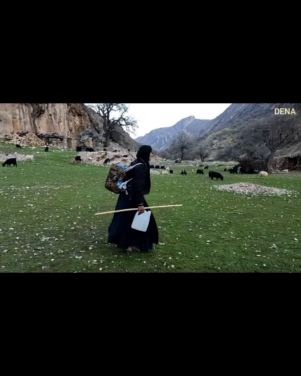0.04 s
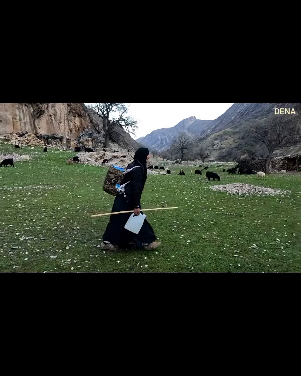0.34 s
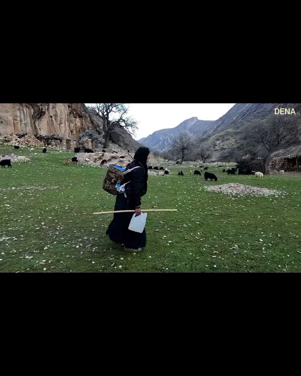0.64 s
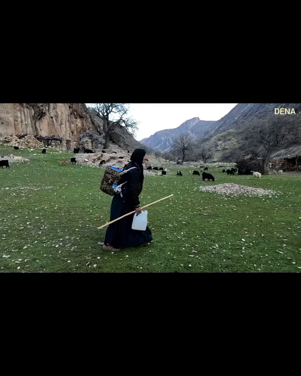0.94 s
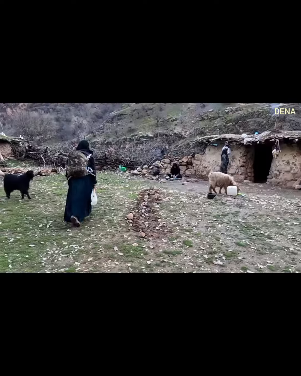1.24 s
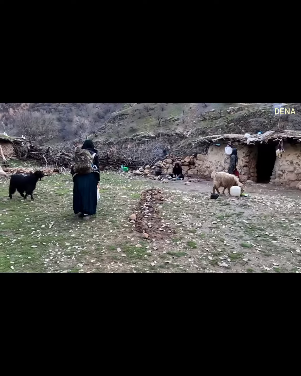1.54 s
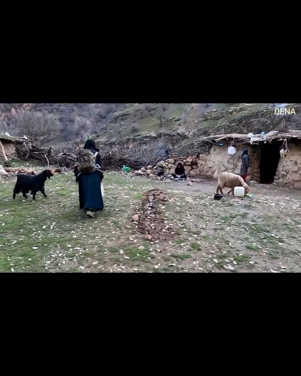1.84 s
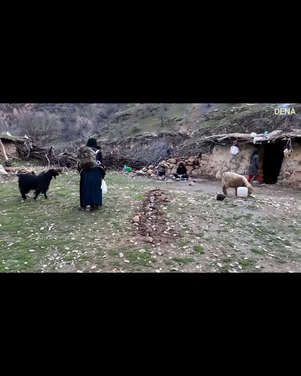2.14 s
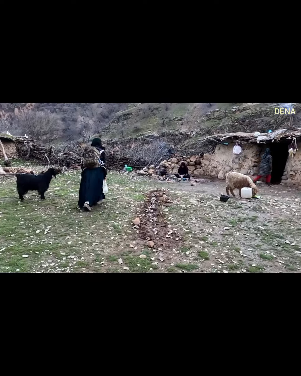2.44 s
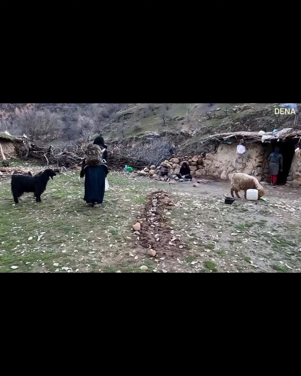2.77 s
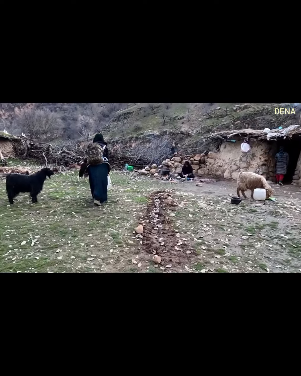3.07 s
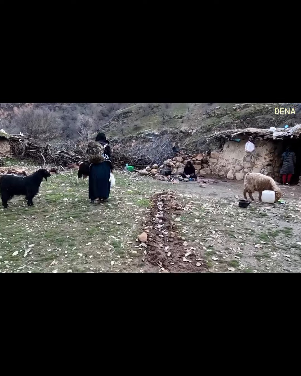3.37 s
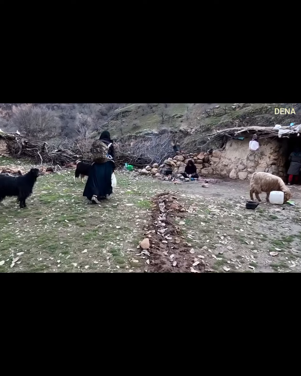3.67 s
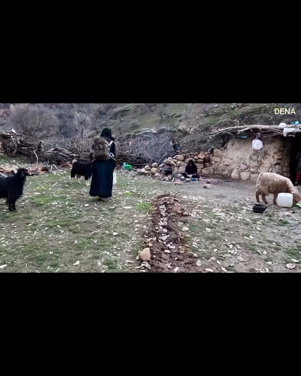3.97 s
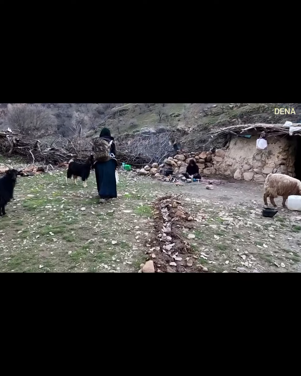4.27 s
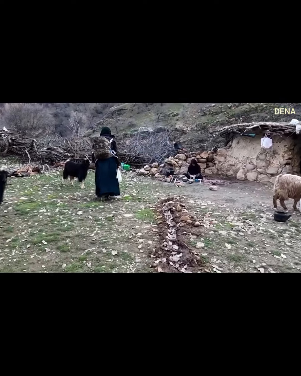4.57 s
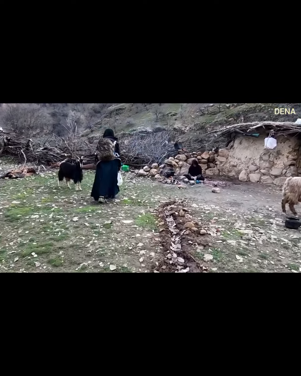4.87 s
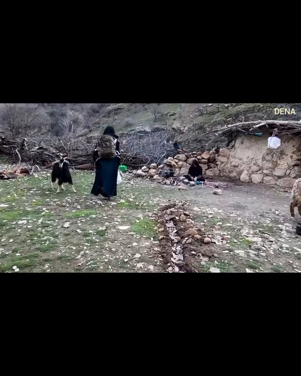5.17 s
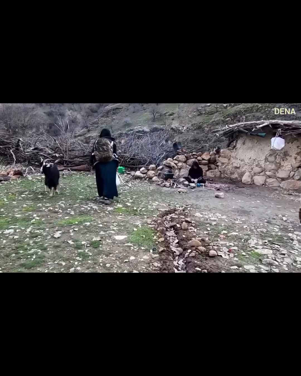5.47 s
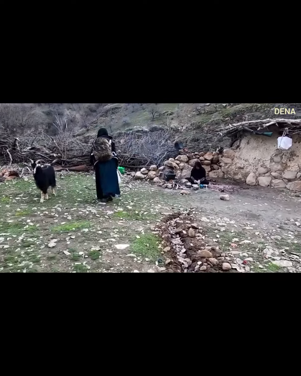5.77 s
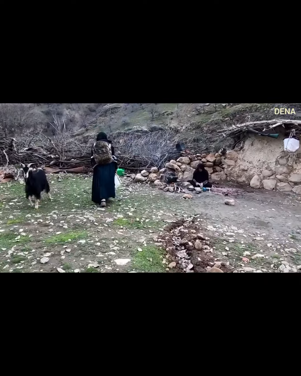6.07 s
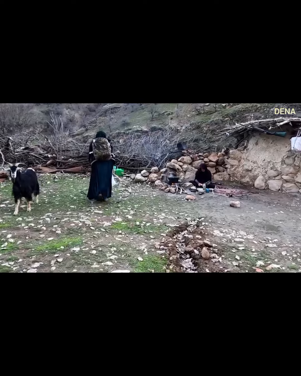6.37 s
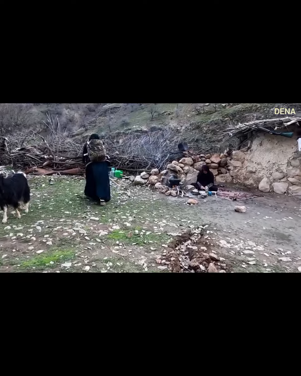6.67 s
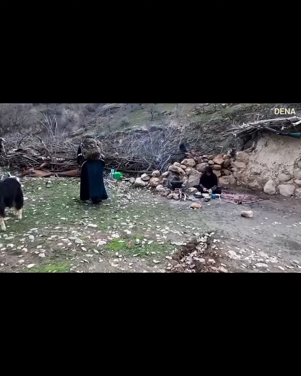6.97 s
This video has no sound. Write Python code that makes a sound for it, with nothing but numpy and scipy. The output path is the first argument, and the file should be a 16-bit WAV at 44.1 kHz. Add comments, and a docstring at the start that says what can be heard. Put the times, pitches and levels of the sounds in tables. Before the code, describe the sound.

For the first second, wind buffets the microphone on an open pasture, a low rumble with faint gravel scuffs and a sharp stone click at about 0.6 seconds. After a very brief gap, the sound moves to a stony yard with a steady low rush of air and lighter wind. A goat gives a distant, quavering bleat from 1.1 to 1.6 seconds, with a short wind thump under it. From about 2 seconds, a barely audible thin sizzle flickers on the left. A second, nasal bleat runs from 3.1 to 3.7 seconds, ending hoarsely and echoing slightly off a wall. A third, closer and more open bleat comes from 5.2 to 5.7 seconds. Soft footsteps scuff gravel throughout, with small stone clicks and a few dull heel falls in the second half. Three very faint high chirps come around 6.7 to 7 seconds.

```python
"""Goats bleat three times in a stony yard: throbs of vocal-fold pulses ring the throat and echo off a wall.
Before that, wind buffets the microphone on a pasture for a second; a brief gap leads into the yard.
Under the bleats: a low rush of air, lighter wind, steps scuffing gravel, small stones clicking.
A thin sizzle flickers on the left; three faint chirps come near the end."""
import sys
import numpy as np
from scipy import signal
from scipy.fft import rfft, irfft
from scipy.io import wavfile
from scipy.ndimage import uniform_filter1d

SR = 44100
rng = np.random.default_rng(int(sys.argv[2]) if len(sys.argv) > 2 else 0)


def wav_record(signal):
    """Record a signal, one row per channel, as 16-bit PCM in the file named by sys.argv[1]."""
    frames = np.transpose(np.atleast_2d(signal))
    bounded = np.clip(frames, -1, 1)
    # unit amplitude maps onto the largest positive 16-bit level
    quanta = np.round(bounded * 32767).astype(np.int16)
    wavfile.write(sys.argv[1], SR, quanta)


N = 313992
TIME_S = np.arange(N) / SR
FREQ_HZ = np.maximum(np.arange(N // 2 + 1) * SR / N, 1)
PASTURE_END_S, YARD_START_S = 1.009, 1.034

# air and wind spectra: (frequency [Hz], relative density [dB])
PASTURE_SPECTRUM = [(88, -25), (150, -4.5), (229, -9), (294, -13), (468, -16), (802, -22.5),
                    (1490, -22.5), (3090, -42), (4300, -51.5), (7200, -49.5), (9000, -63),
                    (12600, -56.5), (15000, -80)]
YARD_SPECTRUM = [(41, -28), (70, -1.5), (100, -0.5), (155, 4), (246, 2), (337, -1.5), (462, -4), (618, -9),
                 (1010, -13), (1820, -19.5), (3410, -32), (4800, -41), (7310, -44.5), (8950, -52),
                 (11200, -55), (12500, -73), (15000, -70)]
WIND_SPECTRUM = [(8.8, -65), (15, 6.5), (51, 5), (183, -19.5), (258, -22.5), (292, -27), (330, -19.5),
                 (400, -50), (520, -69), (880, -120)]
# yard air and wind envelopes: (time [s], level [dB])
LOW_RUSH_LEVEL = [(1.04, -47), (1.5, -45), (2.0, -49), (3.3, -48), (7.12, -46.5)]
MID_RUSH_LEVEL = [(1.04, -78), (4.2, -71.5), (5.6, -65), (7.12, -59)]
YARD_WIND_LEVEL = [(1.04, -37), (1.28, -49), (1.55, -49.5), (2.1, -58.5), (3.0, -55.5), (3.7, -48),
                   (4.2, -55), (6.2, -51), (7.12, -61)]
# wind buffets: (time [s], length [s], frequency [Hz], peak [dB])
BUFFETS = [(1.168, 0.011, 97, -27), (3.81, 0.052, 44, -38.5)]
# grainy bursts: (time [s], length [s], level [dB])
# at 5.196 s, breathy hiss at the start of the third bleat; the rest are gravel scuffs
BURSTS = [(0.008, 0.06, -73.5), (0.518, 0.13, -69), (0.616, 0.056, -77), (0.947, 0.14, -73.5),
          (2.343, 0.089, -79.5), (3.143, 0.033, -76), (3.65, 0.21, -73.5), (4.235, 0.034, -76),
          (4.472, 0.12, -78), (4.854, 0.097, -78), (5.023, 0.35, -82.5), (5.196, 0.037, -70),
          (5.75, 0.11, -71), (6.06, 0.044, -72), (6.26, 0.032, -79), (6.457, 0.21, -76.5), (6.56, 0.1, -79),
          (6.666, 0.093, -74), (6.895, 0.041, -76)]
# grain resonances: (centre [Hz], width [Hz], gain [dB])
GRAIN_MODES = [(3500, 3200, -2), (5150, 1870, -4), (6850, 2000, -8.5), (9700, 3000, -16.5),
               (12400, 1800, -18.5)]
# stone clicks: (time [s], peak [dB], centre [Hz], width [Hz], T60 [s])
CLICKS = [(0.5913, -29, 2660, 2310, 0.0011), (0.593, -47, 3340, 900, .002), (0.78, -48, 3300, 2000, 0.02),
          (1.198, -49, 5400, 2600, 0.0048), (3.669, -47, 5360, 4500, 0.0051),
          (3.694, -47.5, 5970, 3500, 0.0073), (5.225, -50, 7100, 800, 0.011),
          (6.333, -42.5, 4900, 7100, 0.028), (6.388, -46, 4600, 2000, 0.0088),
          (6.522, -52, 6000, 8000, 0.022), (6.524, -43.5, 3130, 400, 0.027)]
# heel strikes: (time [s], peak [dB], T60 [s])
FOOTFALLS = [(4.459, -38, 0.0083), (4.505, -36, .024), (5.819, -39, 0.024), (6.445, -39, 0.023),
             (7.077, -38, 0.0086)]
# bleat throbs: (time [s], length [s], pitch [Hz], glide [Hz/s], level [dB], mouth opening [0-1],
# roughness [0-1])
DISTANT_THROBS = [(1.078, 0.021, 320, 604, -47, 0.8, 0.31), (1.172, 0.037, 321.4, 749, -47.5, .92, 0.24),
                  (1.261, 0.035, 340.6, 550, -44.5, 0.99, 0.18), (1.353, 0.035, 330, 500, -46, 0.95, 0.17),
                  (1.444, 0.031, 308.6, 305, -48, 0.91, .24), (1.535, 0.036, 289, -200, -49, 0.52, .5)]
HOARSE_THROBS = [(3.092, .04, 208, 700, -41.5, .1, 0.1), (3.2, 0.046, 297.7, 445, -39, 0.49, 0.17),
                 (3.31, 0.037, 313.6, 196, -38.5, 0.93, 0.062), (3.411, 0.049, 317.3, 72, -39.5, 1, 0.15),
                 (3.508, 0.045, 307.6, -140, -40.5, 0.94, 0.11),
                 (3.605, .07, 286.4, -500, -50.5, 0.7, 0.91)]
CLOSE_THROBS = [(5.192, 0.03, 314.3, 300, -53, .98, .14), (5.313, .042, 328, 304, -48, 1, 0.19),
                (5.427, .046, 325.4, 403, -35.5, 0.84, 0.11), (5.547, 0.04, 324, 63, -37, .95, 0.173),
                (5.671, .043, 290.7, -950, -37, .48, 0.19)]
# throat resonances: (centre [Hz], width [Hz], gain [dB])
BRIGHT_THROAT = [(320, 240, 0), (632, 190, -1.5), (1276, 120, 4), (2150, 170, -0.5), (2970, 550, -3.5),
                 (3730, 390, -0.5), (4100, 150, -8), (6600, 330, -17.5), (8150, 280, -24)]
NASAL_THROAT = [(284, 88, -6.5), (673, 103, 4), (1380, 420, -7), (1898, 74, 1.5), (3140, 200, -3),
                (3770, 190, -4.5), (4380, 170, -14), (5050, 480, -22.5), (6530, 480, -33)]
OPEN_THROAT = [(324, 93, -2.5), (780, 168, 7.5), (1386, 160, 1.5), (2280, 85, -8), (2840, 200, -6),
               (3600, 200, -12.5), (4240, 290, -9.5), (4850, 250, -17.5), (6060, 730, -21),
               (7230, 580, -20), (10100, 1000, -33), (13100, 900, -40)]


def undb(db):
    """Decibels to gain."""
    return 10 ** (np.asarray(db) / 20)


def unit(x):
    """Scale to rms 1."""
    return x / np.sqrt(np.mean(x ** 2))


def curve(rows):
    """Linear envelope through (time, value) rows."""
    return np.interp(TIME_S, *np.transpose(rows))


def swell(t, length_s, edge=2):
    """Bell at t = 0, length_s wide at half height; higher edge, steeper flanks."""
    bell, near = np.zeros(len(t)), np.abs(t) < 2 * length_s
    bell[near] = 2 ** -(np.abs(2 * t[near] / length_s) ** edge)
    return bell


def pan(x, left_db):
    """Mono to stereo by left minus right level."""
    return undb(np.array([[left_db], [-left_db]]) / 2) * x


def add(out, start_s, x):
    """Mix x into out at start_s."""
    i = int(start_s * SR)
    out[i:i + len(x)] += x[:max(N - i, 0)]


def bins_hz(size):
    """FFT bin frequencies, floored at 1 Hz."""
    return np.maximum(np.arange(size // 2 + 1) * SR / size, 1)


def resonance(f, hz, width_hz):
    """Complex response, gain 1 at the centre."""
    return 1 / (1 + 1j * (f * f - hz * hz) / (f * width_hz))


def band(x, hz, width_hz):
    """Band-pass: one resonance applied twice."""
    return irfft(rfft(x) * resonance(bins_hz(len(x)), hz, width_hz) ** 2, len(x))


def walk(rate_hz, size=N):
    """Smooth random signal, spread near 1."""
    step = max(int(SR / rate_hz), 1)
    return uniform_filter1d(np.repeat(rng.standard_normal(size // step + 1), step), step)[:size]


def air_noise(spectrum, side_db, apart_hz):
    """Shaped stereo noise; the two ports differ more at short wavelengths."""
    hz, db = np.transpose(spectrum)
    gain = undb(np.interp(np.log(FREQ_HZ), np.log(hz), db))
    side_share = np.minimum(undb(side_db) * np.sqrt(1 + FREQ_HZ / apart_hz), 1)
    mid, side = (irfft(rfft(rng.standard_normal(N)) * g, N) for g in (gain, gain * side_share))
    return (mid + side * np.array([[1], [-1]])) / np.std(mid)


def air_rush():
    """Moving air: pasture, then yard, where a mid band grows."""
    pasture = air_noise(PASTURE_SPECTRUM, side_db=-13.5, apart_hz=1500) * undb(-50 + .5 * walk(4.7))
    low = air_noise(YARD_SPECTRUM, side_db=-23, apart_hz=437)
    low *= undb(curve(LOW_RUSH_LEVEL) + 1.2 * walk(13))
    mid_gain = undb(curve(MID_RUSH_LEVEL) + 1.2 * walk(18))
    mid = mid_gain * unit(band(rng.standard_normal(N), hz=1105, width_hz=580))
    return np.where(TIME_S < PASTURE_END_S, pasture, low + mid)


def wind():
    """Eddies rumble on the microphone ports; two land as thumps."""
    strong = air_noise(WIND_SPECTRUM, side_db=-11.5, apart_hz=500) * undb(-35 + 2.3 * walk(15.7))
    light = air_noise(WIND_SPECTRUM, side_db=-17, apart_hz=500) * undb(curve(YARD_WIND_LEVEL))
    thumps = sum(undb(db) * swell(TIME_S - at_s, length_s) * np.cos(2 * np.pi * hz * (TIME_S - at_s))
                 for at_s, length_s, hz, db in BUFFETS)
    return np.where(TIME_S < PASTURE_END_S, strong, light) + thumps


def sizzle(start_s=1.6, attack_s=.49):
    """Thin flickering treble noise, fading in on the left."""
    fade = np.clip((TIME_S - start_s) / attack_s, 0, 1)
    flicker = undb(-97 + 3.5 * walk(6) + 2.2 * walk(90))
    hiss = unit(band(rng.standard_normal(N), hz=12500, width_hz=1600))
    return pan(fade * flicker * hiss, left_db=25)


def chirps(start_s=6.73, period_s=.142, length_s=.035, hz=7350, level_db=-71.5):
    """Three faint wavering notes."""
    notes = sum(swell(TIME_S - start_s - k * period_s, length_s) for k in range(3))
    pitch_hz = hz * (1 + .046 * walk(1500))
    return undb(level_db) * notes * np.sin(2 * np.pi * np.cumsum(pitch_hz) / SR)


def grains(rate_hz=420, spread_db=2.7):
    """Tiny impulses, random in time and strength."""
    count = int(rate_hz * N / SR)
    strength = rng.choice([-1, 1], count) * undb(spread_db * np.minimum(rng.exponential(size=count), 4))
    return np.bincount(rng.integers(0, N, count), strength, N)


def gravel_and_breath(shuffle_db=-88, rise_db_per_s=1.2):
    """Showers of ringing grains: gravel scuffs, growing shuffle, one breathy hiss at the third bleat."""
    bursts = sum(undb(db) * swell(TIME_S - at_s, length_s) for at_s, length_s, db in BURSTS)
    shuffle = undb(shuffle_db + rise_db_per_s * TIME_S + 1.2 * walk(5.5))
    jerks = undb(2.6 * walk(140))
    texture = np.array([
        unit(sum(undb(db) * unit(band(grains(), hz, width_hz)) for hz, width_hz, db in GRAIN_MODES))
        for _ in range(3)])  # common, left, right
    return pan((bursts + shuffle) * jerks * (texture[0] + 1.07 * texture[1:]), left_db=2.2)


def knock(peak_db, hz, width_hz, t60_s, size=4096):
    """Dry impact: impulse and noise burst in one band; soil damps the treble."""
    t = TIME_S[:size]
    contact = rng.standard_normal(size) * undb(-60 * t / t60_s) + 3 * (t == 0)
    soil = signal.butter(2, min(2 * hz, .45 * SR), fs=SR, output="sos")
    tick = signal.sosfilt(soil, band(contact, hz, width_hz))
    return undb(peak_db) * tick / np.abs(tick).max()


def stones_and_heels():
    """Stones knock together; heels land dully on packed soil."""
    out = np.zeros(N)
    for at_s, peak_db, hz, width_hz, t60_s in CLICKS:
        add(out, at_s, knock(peak_db, hz, width_hz, t60_s))
    for at_s, peak_db, t60_s in FOOTFALLS:
        add(out, at_s, knock(peak_db, hz=1100, width_hz=870, t60_s=t60_s))
    return pan(out, left_db=2.5)


def yard_echo(x, wall_s, wall_db, tail_db, t60_s):
    """Direct sound, one bright slap off a stone wall, a scattered tail from the slope."""
    t = TIME_S[:SR // 2]
    scatter = np.array([band(rng.standard_normal(len(t)), hz=2760, width_hz=6000) for _ in range(3)])
    scatter *= undb(-60 * t / t60_s) * (t > .012)
    scatter /= np.sqrt(np.sum(scatter ** 2, axis=1, keepdims=True))
    tail = signal.fftconvolve(x[None], scatter[0] + 1.3 * scatter[1:], axes=1)[:, :N]
    slap = np.interp(TIME_S - wall_s, TIME_S, band(x, hz=2570, width_hz=7000))
    return x + undb(wall_db) * slap + undb(tail_db) * tail


def throat_response(throat, shift, size):
    """Minimum-phase resonances with deep valleys; the upper ones move by the fraction shift."""
    f = bins_hz(size)
    f = f / (1 + shift * np.clip(f / 1000 - 1, 0, 1))
    power = sum(np.abs(undb(db) * resonance(f, hz, width_hz) * resonance(f, hz, 3 * width_hz)) ** 2
                for hz, width_hz, db in throat)
    cepstrum = irfft(np.log(power + 1e-8))
    cepstrum[0] /= 2
    return np.exp(rfft(cepstrum[:size // 2], size))


def vocal_folds(pitch_hz, rough, jitter=.058, shimmer_db=1.2):
    """Spectrum of fold pulses; with roughness they alternate strong and weak and give way to breath."""
    size = len(pitch_hz)
    f = bins_hz(size)
    orders = np.arange(1, 48)[:, None]
    pitch_hz = pitch_hz * (1 + jitter * rough * walk(300, size))
    phase = 2 * np.pi * np.cumsum(pitch_hz) / SR
    # uneven closure smears the treble
    lag_rad = .8 * np.minimum(orders / 10, 1) ** 2 * rng.standard_normal(orders.shape)
    pulses = unit(np.sum(np.cos(orders * phase + lag_rad) * (orders * pitch_hz < SR / 2), axis=0))
    alternation = 1 + .45 * rough * np.cos(phase / 2)
    pulses *= undb(shimmer_db * walk(300, size)) * alternation * np.sqrt(1 - .8 * rough)
    breath = unit(rng.standard_normal(size) * (1.5 + np.cos(phase)))
    return rfft(pulses) + 2 * rfft(rough * breath) * f / (f + 2500)


def bleat(throbs, throat, sag, warble, edge, rise_db, muffle_db, dull_db, swing, size=8192):
    """Run of throbs: warbling fold pulses ring a moving throat, with a rasp at both ends of each."""
    out = np.zeros(N)
    t = (np.arange(size) - size // 2) / SR
    f = bins_hz(size)
    shut_loss_db = muffle_db * f ** 4 / (f ** 4 + 480 ** 4) + dull_db * f ** 2 / (f ** 2 + 2000 ** 2)
    low_rise_db = rise_db / (1 + (f / 1800) ** 4)
    for at_s, length_s, hz, glide_hz_per_s, db, mouth, roughness in throbs:
        progress = np.tanh(2 * t / length_s)
        rasp = .3 * swell(np.abs(t) - .48 * length_s, .4 * length_s)
        wobble = warble * mouth ** 2 * np.sin(2 * np.pi * t / length_s) * swell(t, 1.5 * length_s)
        droop = sag * (1 - swell(t, length_s))  # low pressure at both ends
        pitch_hz = (hz + glide_hz_per_s * length_s / 2 * progress) * (1 + wobble - droop)
        source = vocal_folds(pitch_hz, np.minimum(roughness + rasp, 1))
        lips = undb(-(1 - mouth) * shut_loss_db)
        shift = .008 * rng.standard_normal() - .08 * (1 - mouth)
        voice = np.zeros(size)
        for half in (-1, 1):  # crossfade from early to late throat shape
            tract = undb(half * low_rise_db) * throat_response(throat, half * swing + shift, size)
            voice += (1 + half * progress) * irfft(source * lips * tract)
        voice /= np.std(voice[np.abs(t) < length_s / 2])
        add(out, at_s - size / 2 / SR, undb(db) * voice * swell(t, length_s, edge))
    return out


def goats():
    """Two bleats near the walls, the second ending hoarsely; then a closer, drier one."""
    distant = bleat(DISTANT_THROBS, BRIGHT_THROAT, sag=.06, warble=.014, edge=2,
                    rise_db=0, muffle_db=27, dull_db=24, swing=.015)
    hoarse = bleat(HOARSE_THROBS, NASAL_THROAT, sag=.03, warble=.0059, edge=1.85,
                   rise_db=-.5, muffle_db=47.5, dull_db=38, swing=.0072)
    close = bleat(CLOSE_THROBS, OPEN_THROAT, sag=.045, warble=.024, edge=4.5,
                  rise_db=7, muffle_db=-4, dull_db=16, swing=-.01)
    distant = yard_echo(distant, wall_s=.021, wall_db=-23, tail_db=-15.5, t60_s=.18)
    hoarse = yard_echo(hoarse, wall_s=.032, wall_db=-8, tail_db=-12, t60_s=.14)
    close = yard_echo(close, wall_s=.02, wall_db=-25, tail_db=-22, t60_s=1)
    return distant + hoarse + pan(close, left_db=2.3)


def scene(widen_start_s=3.54, widen_tau_s=1.37, side_db=2.5, gap_db=-43):
    """Pasture, brief gap, then the yard: centred at first, widening later."""
    outdoors = air_rush() + wind() + goats() + stones_and_heels() + gravel_and_breath()
    mid = outdoors.mean(axis=0)
    opening = 1 - np.exp(-np.maximum(TIME_S - widen_start_s, 0) / widen_tau_s)
    width = undb(side_db) * np.where(TIME_S < PASTURE_END_S, 1, opening + undb(-55))
    mix = mid + (outdoors - mid) * width + chirps() + sizzle()
    pasture_fade = np.clip((PASTURE_END_S - TIME_S) / .012, 0, 1) ** 2
    yard_fade = np.clip((TIME_S - YARD_START_S) / .03, 0, 1)
    return mix * np.maximum(pasture_fade + yard_fade, undb(gap_db))


def record(dry, fade_s=.002, cutoff_hz=15300):
    """Short end fades and a steep low-pass."""
    fade = np.minimum(np.minimum(TIME_S, TIME_S[-1] - TIME_S) / fade_s, 1)
    return signal.sosfilt(signal.ellip(10, .2, 80, cutoff_hz, fs=SR, output="sos"), dry * fade)


dry = scene()
out = record(dry)
wav_record(out)
```